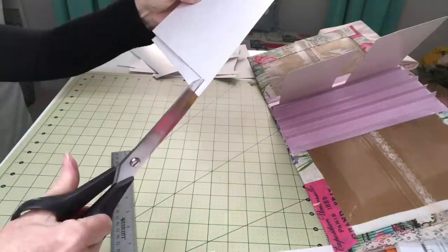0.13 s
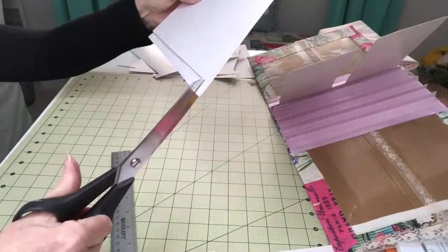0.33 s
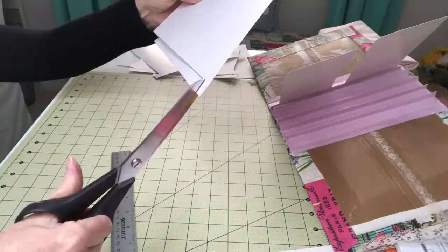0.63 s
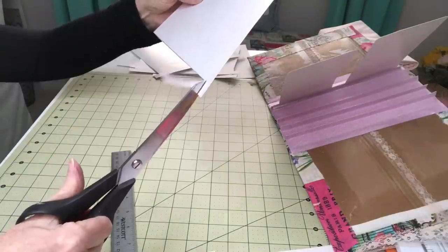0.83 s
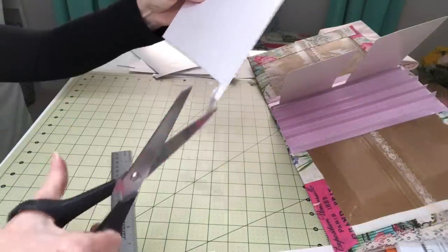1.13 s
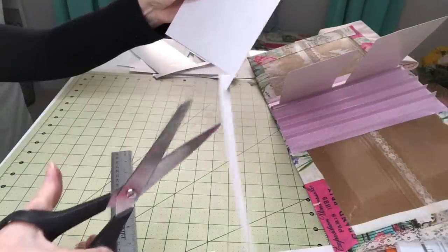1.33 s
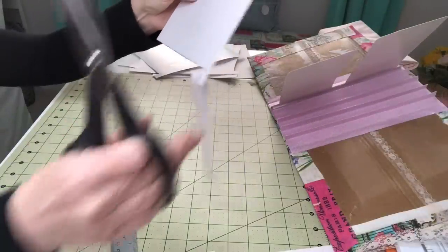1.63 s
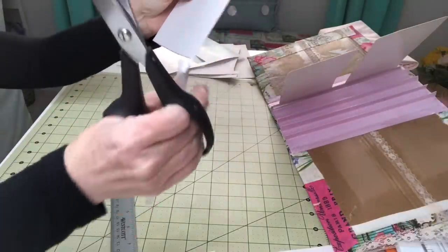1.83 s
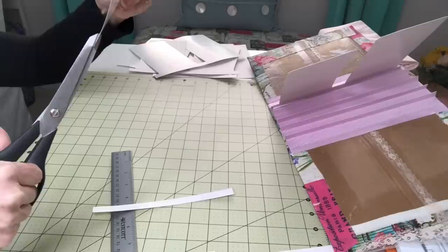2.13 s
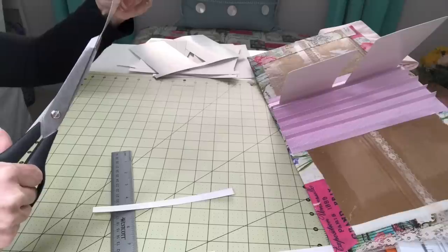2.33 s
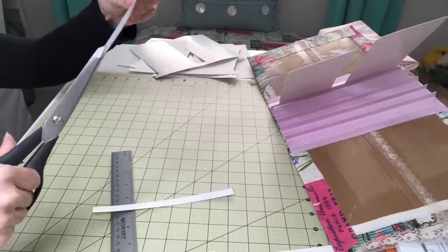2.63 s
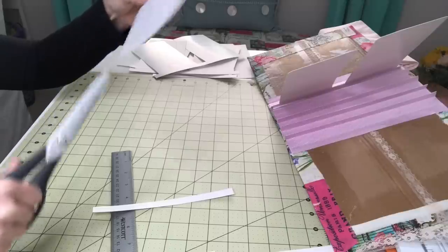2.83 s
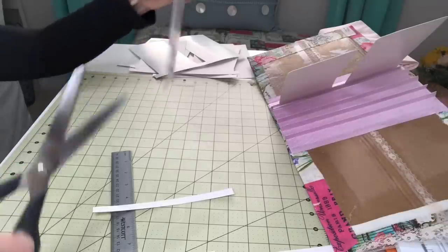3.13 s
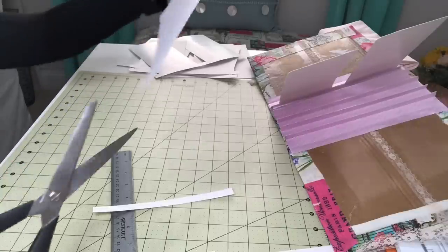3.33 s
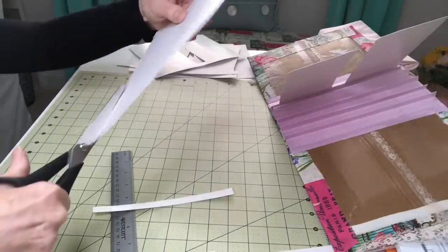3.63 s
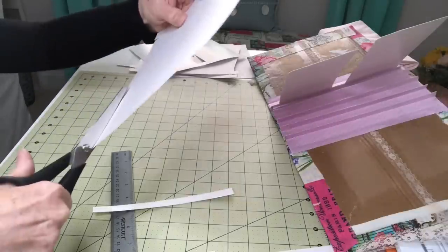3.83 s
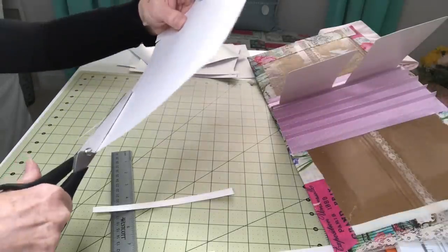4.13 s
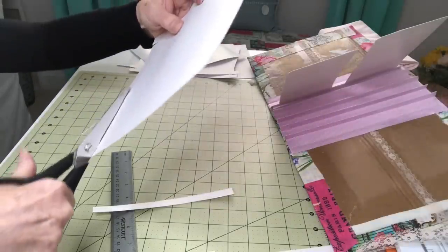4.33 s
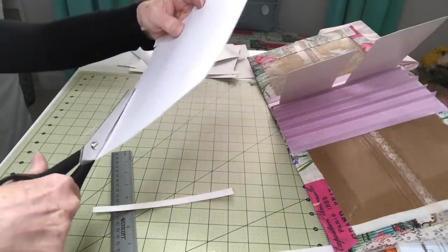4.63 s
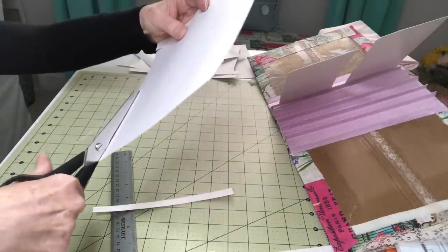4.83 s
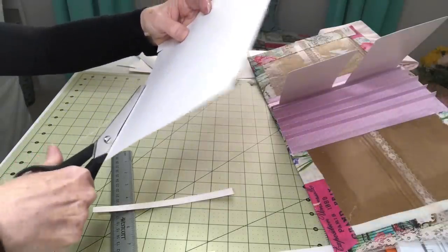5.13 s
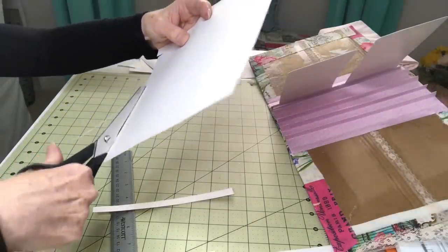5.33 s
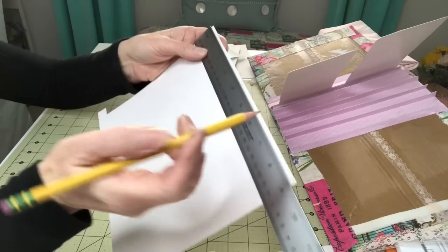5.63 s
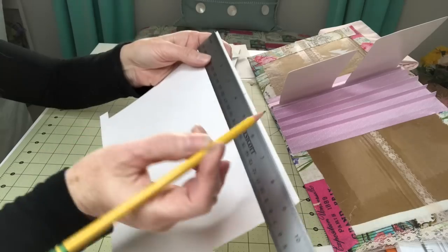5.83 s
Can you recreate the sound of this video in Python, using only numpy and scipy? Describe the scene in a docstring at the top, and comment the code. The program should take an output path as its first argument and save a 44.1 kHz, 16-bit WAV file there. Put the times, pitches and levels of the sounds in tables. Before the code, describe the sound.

Close, dry scissor cuts in stiff card, crackling and snapping between pauses, then sheet rubbing and small taps in a quiet room.

```python
"""In a quiet room with mains hum and a slowly swaying table, scissors trim stiff poster board close by.
From the first cut, snapping fibres and rubbing blades force the resonances of board, cut edge and steel.
Blade tips knock shut amid small pitched knocks; later the sheet slides, the blades squeak, the pivot chatters.
Near the end a pencil taps a ruler: short sums of decaying modes.
The sound dips to silence three times, near 2.0, 3.5 and 5.6 s."""
import sys
import numpy as np
from scipy import signal
from scipy.fft import rfft, irfft
from scipy.io import wavfile
from scipy.ndimage import uniform_filter1d

SR = 44100
rng = np.random.default_rng(int(sys.argv[2]) if len(sys.argv) > 2 else 0)


def digitize_waveform(pressure):
    """Quantize a signal to 16-bit integers and store it at the path in sys.argv[1].

    Rows of a 2-D input are taken as channels; values are limited to [-1, 1].
    """
    field = np.atleast_2d(pressure).T
    bounded = np.clip(field, -1, 1)
    quanta = np.round(bounded * 32767).astype(np.int16)
    wavfile.write(sys.argv[1], SR, quanta)


N = 264600
T = np.arange(N) / SR

# spectrum of room air and microphone hiss: frequency_hz, relative_density_db
AIR_SPECTRUM = [(12, -35), (20, 1), (34, -17.5), (96, -17), (257, -23.5), (304, -24), (381, -25.5),
                (597, -29.5), (1640, -36), (1890, -38.5), (2720, -39), (15000, -48), (16400, -63)]
AIR_RMS_DB, HUM_HZ = -62, 59.96
# mains hum, fundamental first, then its multiples: rms_db
HUM_RMS_DB = (-65.5, -73, -76, -75.5, -78.5)
# table moving under the hands: time_s, slow_sway_db, thuds_db
SWAY = [(0.0, -45, -61), (0.13, -44, -55.5), (0.5, -58.5, -63.5), (1.87, -43.5, -66.5), (2.69, -49, -69),
        (2.84, -43.5, -40.5), (3.02, -35, -90), (3.42, -35.5, -53), (3.91, -48.5, -49.5),
        (5.08, -47.5, -52.5), (5.6, -42, -64), (5.72, -32, -69), (5.87, -25.5, -70), (5.97, -34, -63)]

# resonances of the cut board, its edge and the blades: frequency_hz, width_hz, relative_level_db
BOARD_MODES = [(411, 134, 0), (578, 104, -4.5), (767, 97, -0.5), (927, 355, -0.5), (1408, 320, -2)]
EDGE_MODES = [(1917, 340, 2.5), (2680, 390, 5), (4460, 1140, 7.5), (6060, 1500, 4)]
BLADE_MODES = [(7120, 940, 4.5), (8630, 420, 2.5), (9300, 530, 1.5), (11280, 1450, 3.5), (14200, 910, -3.5)]
# snaps of fibres and small knocks: start_s, strength_db, brightness_db (blades up, board down), length_ms
SNAPS = [(0.2712, -43, 0.5, 7), (.3277, -56.5, 3, 5.2), (.341, -64, 13, 4.5), (0.39, -43.5, 3.5, 4),
         (.398, -49, 2.5, 3.5), (.4125, -54, 2, 3.8), (0.424, -47.5, 2, 4.7), (0.4637, -56, 6, 5.6),
         (0.4846, -63.5, 15, 3.8), (0.493, -62, 2, 2.5), (0.513, -57, 5.5, 10), (0.575, -80.5, 27, 2.8),
         (.604, -64, 4.5, 4.3), (0.666, -53.5, 13.5, 3.5), (0.679, -44, 5.5, 6.5), (0.713, -56, 0, 1.7),
         (0.733, -45.5, 0, 4.1), (0.7794, -48, 1, 3.7), (.823, -32, -2, 3.8), (1.0248, -40.5, 0, 4.9),
         (1.0711, -41.5, 7.5, 3.6), (1.1323, -51.5, -3, 5.4), (1.979, -43, 2, 4.8), (2.0845, -43, 3.5, 3.8),
         (2.099, -49, -12, 3.2), (2.1102, -51, 9, 12), (2.233, -47, -0.5, 4.6), (2.284, -79, 10, 2.2),
         (2.296, -60, 14, 17), (2.3044, -39, -6, 3), (2.3336, -45.5, 2.5, 7), (2.3566, -53, 5, 4.5),
         (2.3746, -55, -2, 10.6), (2.3853, -62.5, 14, 5.2), (2.5184, -29.5, -1, 3.4), (2.7418, -44.5, 9, 2),
         (3.0549, -41.5, 4.5, 4.4), (3.911, -45.5, 5.5, 4.8), (3.9878, -46, 0, 7.5),
         (4.004, -48.5, -10, 4.2), (4.016, -51, -4, 8.1), (4.036, -41, -5, 10), (4.052, -42, -3, 10.6),
         (4.086, -44, -3, 2.1), (4.094, -42, -3, 7.9), (4.103, -42.5, -3.5, 7.8), (4.115, -51, 2, 7.5),
         (4.137, -51, 10, 7.7), (4.156, -44, -1, 11), (4.165, -42.5, -1.5, 9.2), (4.183, -46.5, -4.5, 6.7),
         (4.593, -52.5, 14.5, 4.3), (4.6064, -40.5, -4, 4.4), (4.6102, -45, -10, 4.8),
         (4.619, -54.5, -13, 8.9), (4.638, -35, -6, 4.6), (4.6491, -34.5, -4.5, 7.5),
         (4.6652, -37.5, -4.5, 6.3), (4.674, -36, -3, 4.3), (4.694, -42.5, -5, 3.7), (4.7103, -38, -2.5, 6),
         (5.1169, -42, 9.5, 5.3), (5.1313, -35, -4, 5.7), (5.1436, -33, -7, 3.6), (5.157, -36, -0.5, 5.4),
         (5.173, -34, -3, 2.8), (5.187, -40, -1, 3.8), (5.1962, -34.5, 0, 5.7)]
# push of a snap on board, cut edge, blades: relative_level_db
SNAP_PUSH_DB = (-2.5, 0, -1.5)
# small ticks of the sheet's edge while it is handled: start_s, strength_db
EDGE_TICKS = [(1.273, -45), (1.3275, -50.5), (1.3415, -50), (1.415, -57), (1.443, -53.5), (1.454, -53),
              (1.965, -62), (2.932, -46), (2.9878, -34), (3.23, -51), (3.338, -48), (3.356, -52)]
# push of a tick on board, cut edge, blades: relative_level_db
TICK_PUSH_DB = (-12, -5, -19.5)
TICK_LENGTH_MS = 4.5
# blades crunching through board: start_s, peak_s, end_s, board_db, cut_edge_db, blades_db
CUTS = [(.27, .33, 1.3, -82, -68.5, -67), (.67, .69, 0.98, -60.5, -74, -69),
        (.829, .842, 0.89, -48.5, -66, -63), (1.025, 1.04, 1.1, -48, -57.5, -56),
        (1.07, 1.105, 1.14, -61, -67.5, -58), (2.04, 2.114, 2.14, -48, -57.5, -61.5),
        (2.2, 2.352, 2.4, -58, -70, -68), (2.52, 2.53, 2.7, -50, -59.5, -68),
        (3.93, 4.04, 4.09, -51.5, -55.5, -66), (4.07, 4.13, 4.23, -53, -51.5, -59),
        (4.6, 4.64, 4.7, -48, -46, -56), (4.7, 4.74, 5.06, -63.5, -65, -83),
        (5.125, 5.15, 5.22, -49, -46.5, -51), (5.21, 5.24, 5.42, -59, -67, -82)]
# board, cut edge, blades in a cut, against their peak: start_db, end_db
CUT_SHAPE = [(-13, -24), (-9.5, -20), (-10, -27)]
CUT_ROUNDNESS, SLIDE_ROUNDNESS = 0.92, 1.24  # 1 = pointed peak, more = rounder

# small pitched knocks and pings of sheet, blades, ruler and pencil: start_s, level_db, pitch_hz
SMALL_KNOCKS = [(.682, -39, 523), (1.08, -37.5, 500), (1.096, -46, 530), (1.114, -50, 515),
                (1.273, -38, 3760), (1.826, -46, 5260), (1.8839, -41, 4930), (1.912, -37, 5400),
                (1.916, -40, 4530), (1.94, -43, 3140), (2.522, -33.5, 383), (2.536, -31.5, 379),
                (2.824, -34, 460), (3.0557, -28.5, 2100), (3.094, -24.5, 9400), (3.555, -48, 233),
                (3.643, -33, 600), (3.649, -36, 310), (3.656, -37, 454), (3.668, -31, 634),
                (3.949, -41.5, 920), (4.289, -47, 167), (4.361, -42, 740), (4.4188, -34.5, 720),
                (4.846, -47.5, 238), (5.675, -52, 3450), (5.719, -43, 2040), (5.992, -39, 300)]
KNOCK_CYCLES = 16.4  # a small knock dies away by 60 dB in this many cycles
# low knock of the closing blade tips: frequency_hz, relative_level_db, t60_s
TIP_KNOCK = (700, -1.5, 0.0081)
CLACK_T60_S = 0.0062
# closings of the blade tips: start_s, level_db, clack_pitch_hz
TIP_BLOWS = [(0.2725, -34.5, 2480), (0.8229, -21.5, 2500), (1.0251, -33, 2450), (1.0717, -28, 2360),
             (2.5192, -18, 3030)]
# modes of ruler and pencil: frequency_hz, relative_level_db, t60_s
RULER_MODES = [(2400, 0, 0.009), (2650, -2.5, 0.0083), (3260, 1, 0.0064), (4700, -19, 0.0056)]
PENCIL_MODES = [(525, -1, 0.0067), (1650, -0.5, 0.013), (1990, -19, 0.014), (3820, -18, 0.025)]
# blows on ruler and pencil: start_s, level_db
RULER_BLOWS = [(5.659, -30)]
PENCIL_BLOWS = [(5.697, -44), (5.6991, -32)]

# board sliding along the blades: start_s, peak_s, end_s, rumble_db, rasp_db, hiss_db, rasp_pitch_hz
SLIDES = [(1.912, 1.953, 2.02, -64, -61, -68, 5070), (2.767, 2.81, 2.877, -48.5, -52.5, -58.5, 3020),
          (2.944, 3.024, 3.19, -56, -61, -58, 3960), (3.198, 3.31, 3.53, -69.5, -71.5, -74.5, 3580),
          (3.543, 3.675, 3.717, -51.5, -52.5, -64.5, 4120), (3.802, 3.859, 3.97, -57, -58, -66, 4100),
          (4.218, 4.377, 4.445, -52.5, -55.5, -62.5, 4060), (4.836, 4.853, 4.895, -51.5, -57.5, -64, 4050),
          (4.871, 4.934, 5.03, -55.5, -56.5, -68, 4000), (5.303, 5.405, 5.53, -51, -57, -63, 3830)]
# rumble, rasp, hiss in a slide, against their peak: start_db, end_db
SLIDE_SHAPE = [(-9, -14), (-13.5, -22.5), (-8.5, -25)]
# low and high resonances of the sliding sheet: frequency_hz, width_hz, relative_level_db
SHEET_MODES = [(174, 323, -4.5), (321, 230, -4), (604, 667, -1), (808, 504, -1.5), (1690, 1100, -11.5)]
SHEEN_MODES = [(6140, 7300, 2), (10200, 3100, 0.5), (13500, 2500, -11.5)]
FLEX_DB = -8  # low thump of the flexing sheet against its rumble

# squeaks and narrow rubbing tones of blades on board: start_s, end_s, pitch_hz, width_hz, level_db
SQUEAKS = [(2.062, 2.27, 2940, 450, -71), (2.54, 2.542, 3450, 895, -56), (3.84, 3.883, 1040, 490, -53),
           (4.18, 4.19, 4400, 700, -55), (3.918, 3.922, 9740, 400, -48.5), (5.114, 5.122, 3760, 300, -59),
           (5.505, 5.59, 3410, 170, -72)]

# stick-slip of the pivot: start_s, length_s, first_rate_hz, last_rate_hz, first_slip_db,
# brightness_db (screw up, handle down by twice as much)
CHATTER = [(2.181, 0.0082, 174, 180, -71, 7), (2.207, 0.034, 179, 150, -68, 5.5),
           (2.577, 0.029, 118.3, 100, -57.5, 7), (2.6061, 0.038, 99, 18, -56, 8),
           (2.621, 0.019, 485, 470, -62, 4), (2.756, 0.024, 88, 82, -58, 6),
           (3.91, 0.032, 425, 880, -37.5, 0), (4.232, 0.02, 190, 300, -52.5, -1.5),
           (4.794, 0.033, 116.3, 195, -54, -2), (5.23, 0.013, 176, 270, -56, 1),
           (5.284, 0.038, 67.5, 186, -48, -3)]
# resonances of steel, screw and handle: frequency_hz, width_hz, relative_level_db
STEEL_MODES = [(5800, 4000, 1), (8400, 560, 3), (9700, 820, 6), (11540, 840, -3.5)]
SCREW_MODES = [(12700, 780, -8), (14700, 830, -10)]
HANDLE_MODES = [(2850, 420, 15), (3980, 520, 5.1)]
SETTLED_DB, SCREW_DB, HANDLE_DB = -60.5, -12, -62.5  # final steel level; screw against steel; handle

# decay of the room's echoes: frequency_hz, t60_s
ROOM_DECAY = [(250, 0.2), (1000, 0.27), (4000, 0.18), (12000, 0.1)]
ROOM_DB = -11.0
# dips to silence: silent_s, fade_out_s, fade_in_s
DIPS = [(2.038, 0.031, 0.0081), (3.539, 0.03, 0.014), (5.603, 0.03, 0.031)]
BAND_LIMIT_HZ = 16450


def gain_of(db):
    """Decibel law: 20 dB is a factor of ten in amplitude."""
    return 10 ** (np.asarray(db) / 20)


def evened(x):
    """Normalization: a signal divided by its root mean square has unit power."""
    return x / np.sqrt(np.mean(x ** 2) + 1e-20)


def read(points, hz):
    """Logarithmic frequency scale: values are interpolated along it."""
    f, value = np.transpose(points)
    return np.interp(np.log(hz + 1), np.log(f + 1), value)


def add(mix, s, sound):
    """Superposition: a sound starting at s seconds adds to what is there."""
    part = mix[:, round(s * SR):][:, :sound.shape[1]]
    part += sound[:, :part.shape[1]]


def band(x, lo_hz, hi_hz):
    """Band-pass filtering: one frequency range remains, at unit power."""
    sos = signal.butter(2, [lo_hz, hi_hz], "bandpass", fs=SR, output="sos")
    return evened(signal.sosfilt(sos, x))


def sway_levels():
    """Amplitude modulation: the gains of sway and thuds follow their levels in time."""
    s, *values = np.transpose(SWAY)
    soft = np.interp(T, [s[0] - .005, s[0], s[-1], s[-1] + 0.11], [0, 1, 1, 0])
    return soft * gain_of([np.interp(T, s, value) for value in values])


def background():
    """Stationary noise and harmonics: coloured air noise and mains hum, over low-frequency table sway."""
    hz = np.fft.rfftfreq(N, 1 / SR)
    coloured = irfft(rfft(rng.standard_normal(N)) * gain_of(read(AIR_SPECTRUM, hz)), N)
    air = gain_of(AIR_RMS_DB) * evened(coloured)
    hum = np.zeros(N)
    for k, db in enumerate(HUM_RMS_DB):
        phase = 2 * np.pi * ((k + 1) * HUM_HZ * T + rng.random())
        hum += np.sqrt(2) * gain_of(db) * np.sin(phase)
    sway_gain, thud_gain = sway_levels()
    sway = sway_gain * band(rng.standard_normal(N), 4.02, 7.65)
    thuds = thud_gain * band(band(rng.standard_normal(N), 8.8, 36.0), 8.8, 36.0)
    return air + hum + sway + thuds


def ring(force, modes, skirt=2.0):
    """Modal response: force is convolved with a unit-energy sum of decaying modes, little outside them."""
    t = np.arange(2048) / SR
    answer = np.zeros(len(t))
    for k, (hz, width, db) in enumerate(modes):
        decay = np.sqrt(width) * np.exp(-np.pi * width * t)
        answer += (-1) ** k * gain_of(db) * decay * np.sin(2 * np.pi * hz * t)
    answer = band(answer, modes[0][0] / skirt, min(modes[-1][0] * skirt, .45 * SR))
    return signal.oaconvolve(force, answer / np.linalg.norm(answer))[:N]


def strokes(events, shape, roundness):
    """Envelope of a stroke: each layer's level rises to a peak and falls by its own amounts."""
    first, last = np.transpose(shape)[:, :, None]
    out = np.zeros((len(shape), N))
    for start, peak, end, *db in events:
        t = np.arange(start - .005, end + 0.073, 1 / SR)
        before = np.interp(t, [start, peak], [1, 0]) ** roundness
        after = np.interp(t, [peak, end], [0, 1]) ** roundness
        soft = np.interp(t, [t[0], start, end, t[-1]], [0, 1, 1, 0])
        peak_db = np.c_[db[:len(shape)]]  # any later column is a pitch
        add(out, t[0], soft * gain_of(peak_db + first * before + last * after))
    return out


def scrape(grains_per_s, grain_db, clump_db, clump_ms, shared, smooth):
    """Granular friction: three rough forces of tiny grains over smooth noise, in partly shared clumps."""
    sizes = gain_of(grain_db * np.minimum(rng.exponential(1, N), 5))
    grains = sizes * (rng.random(N) < grains_per_s / SR)
    memory = np.exp(-1000 / clump_ms / SR)
    clumps = signal.lfilter([1], [1, -memory], rng.standard_normal((3, N)))
    clumps = uniform_filter1d(clumps + shared * clumps.sum(0), size=80)
    clumps = np.clip(evened(clumps), -2, 2)
    signed_grains = evened(grains * rng.choice([-1., 1.], N))
    rough = smooth * rng.standard_normal((3, N)) + signed_grains
    return evened(rough * gain_of(clump_db * clumps))


def snaps(crackle_db=5.0, rise=0.76, board_longer=1.174):
    """Impulsive force: short bursts of crackling noise rise and die away; the board's lasts a little longer."""
    force, t_ms = np.zeros((3, N)), np.arange(2500) / SR * 1000
    pushes = []
    for s, db, bright_db, ms in SNAPS:
        pushes.append((s, db + np.add(SNAP_PUSH_DB, [-bright_db, 0, bright_db]), ms))
    for s, db in EDGE_TICKS:
        pushes.append((s, db + np.array(TICK_PUSH_DB), TICK_LENGTH_MS))
    for s, db, ms in pushes:
        draws = rng.standard_normal((4, 2500))
        crackle = np.clip(evened(uniform_filter1d(draws[3], size=30)), -2, 2)
        rough = draws[:3] * evened(gain_of(crackle_db * crackle))
        u = t_ms / max(ms, .5) / np.array([[board_longer], [1], [1]])
        burst = np.minimum(u / rise, 1) ** 1.22 * np.exp(-u ** 3)
        add(force, s - .0014, gain_of(db)[:, None] * burst * rough)
    return force


def cutting():
    """Forced resonance: crunch and snaps drive the modes of board, cut edge and blades."""
    rough = scrape(grains_per_s=1800, grain_db=1.5, clump_db=4.5, clump_ms=6.8, shared=0.066, smooth=0.75)
    force = snaps() + strokes(CUTS, CUT_SHAPE, CUT_ROUNDNESS) * rough
    bodies = (BOARD_MODES, EDGE_MODES, BLADE_MODES)
    return sum(ring(push, modes) for push, modes in zip(force, bodies))


def knocks(tick_db=-18, tick_hz=5000, rise_ms=0.81):
    """Free vibration after impact: each blow rings briefly in decaying modes, with a dull tick."""
    out, t = np.zeros((1, N)), np.arange(4000) / SR
    blows = [(s, db, [TIP_KNOCK, (hz, 0, CLACK_T60_S)]) for s, db, hz in TIP_BLOWS]
    blows += [(s, db, [(hz, 0, KNOCK_CYCLES / hz)]) for s, db, hz in SMALL_KNOCKS]
    blows += [(s, db, RULER_MODES) for s, db in RULER_BLOWS]
    blows += [(s, db, PENCIL_MODES) for s, db in PENCIL_BLOWS]
    for s, db, modes in blows:
        first_hz = modes[0][0]
        rough = band(rng.standard_normal(4000), first_hz / 2, max(tick_hz, 1.4 * first_hz))
        tick = gain_of(tick_db - 60 * t / 0.017) * rough  # 60 dB down in 17 ms
        rings = sum(gain_of(mode_db - 60 * t / t60) * np.sin(2 * np.pi * hz * t)
                    for hz, mode_db, t60 in modes)
        onset = np.minimum(t * 1000 / rise_ms, 1)
        add(out, s, gain_of(db) * (onset * (rings + tick))[None])
    return out[0]


def sliding(peak_width_hz=1300, peak_db=-1):
    """Friction-driven sheet: rumble and hiss ring its modes; a wide rasp has a peak moving with the bend."""
    low, mid, high = scrape(grains_per_s=2000, grain_db=2.5, clump_db=2.5, clump_ms=4.0, shared=0.03, smooth=1.0)
    s, hz = np.transpose(SLIDES)[[1, 6]]
    # shift the moving pitch to 0 Hz, low-pass, and shift back: a band-pass that glides
    turn = np.exp(2j * np.pi * np.cumsum(np.interp(T, s, hz)) / SR)
    lowpass = signal.butter(2, peak_width_hz / SR)
    peak = evened((turn * signal.lfilter(*lowpass, mid / turn)).real)
    rumble, rasp, hiss = strokes(SLIDES, SLIDE_SHAPE, SLIDE_ROUNDNESS)
    flex = gain_of(FLEX_DB) * rumble * band(rng.standard_normal(N), 40, 193)
    rasping = rasp * evened(gain_of(peak_db) * peak + band(mid, 2520, 5270))
    return flex + ring(rumble * low, SHEET_MODES) + rasping + ring(hiss * high, SHEEN_MODES)


def squeaks():
    """Frictional squeal: narrow-band noise flutters as the blades grip and let go."""
    grip = gain_of(3.6 * np.clip(band(rng.standard_normal(N), 22, 104), -2, 2))
    tones = np.zeros(N)
    for start, end, hz, width, db in SQUEAKS:
        soft = np.interp(T, [start - .01, start, end, end + 0.015], [0, 1, 1, 0])
        tones += gain_of(db) * soft * band(rng.standard_normal(N), hz - width / 2, hz + width / 2)
    return evened(grip) * tones


def chatter(slip_ms=1.0):
    """Stick-slip: regular slips at a drifting rate ring the steel, the screw and, steadily, the handle."""
    force = np.zeros((3, N))
    for start, length, first, last, steel_db, bright_db in CHATTER:
        share = np.linspace(0, 1, round(length * SR))
        rate = first + (last - first) * share
        since_ms = 1000 * (np.cumsum(rate) / SR % 1) / rate  # time since the latest slip
        slips = evened(np.exp(-since_ms / slip_ms) * rng.standard_normal(len(share)))
        db = steel_db + (SETTLED_DB - steel_db) * share
        handle_db = 0 * db + HANDLE_DB - 2 * bright_db
        add(force, start, slips * gain_of([db, db + SCREW_DB + bright_db, handle_db]))
    bodies = (STEEL_MODES, SCREW_MODES, HANDLE_MODES)
    return sum(ring(push, modes, skirt=1.16) for push, modes in zip(force, bodies))


def room(x):
    """Reverberation: sparse echoes of random sign, each band decaying at its own rate."""
    echoes = np.zeros(SR // 2)
    at = np.arange(200, len(echoes) - 20, 20)
    echoes[at + rng.integers(0, 20, len(at))] = rng.choice([-1., 1.], len(at))
    hz, t, z = signal.stft(echoes, SR, nperseg=256)
    decay = gain_of(-60 * t / read(ROOM_DECAY, hz)[:, None])
    tail = signal.istft(z * decay, SR, nperseg=256)[1]
    return signal.oaconvolve(x, tail / np.linalg.norm(tail))[:N]


def scene():
    """Superposition: direct sound, its reverberation and the background add."""
    near = cutting() + knocks() + sliding() + squeaks() + chatter()
    return (background() + near + gain_of(ROOM_DB) * room(near))[None]


def record(dry):
    """Gain and band limitation: the level dips to silence at each dip, then a low-pass acts."""
    fade = np.prod([np.interp(T, [s - out, s, s + back], [1, 0, 1]) for s, out, back in DIPS], axis=0)
    held = np.pad(dry * fade, [(0, 0), (255, 255)], "edge")
    lowpass = signal.firwin(511, BAND_LIMIT_HZ, window=("kaiser", 9), fs=SR)
    return signal.oaconvolve(held, lowpass[None], "valid")


dry = scene()
out = record(dry)
digitize_waveform(out)
```